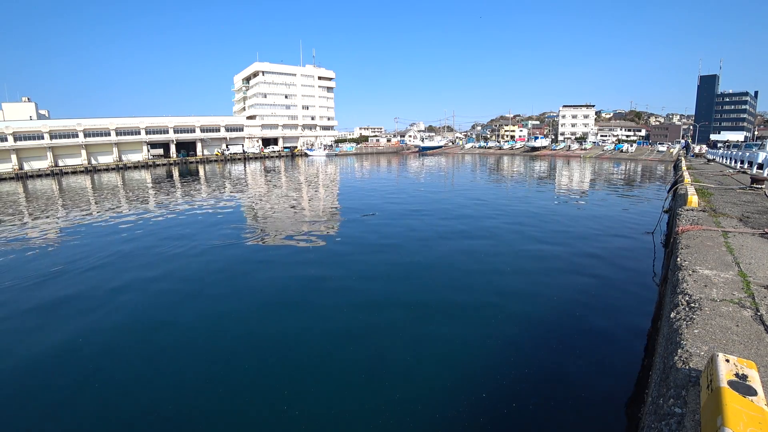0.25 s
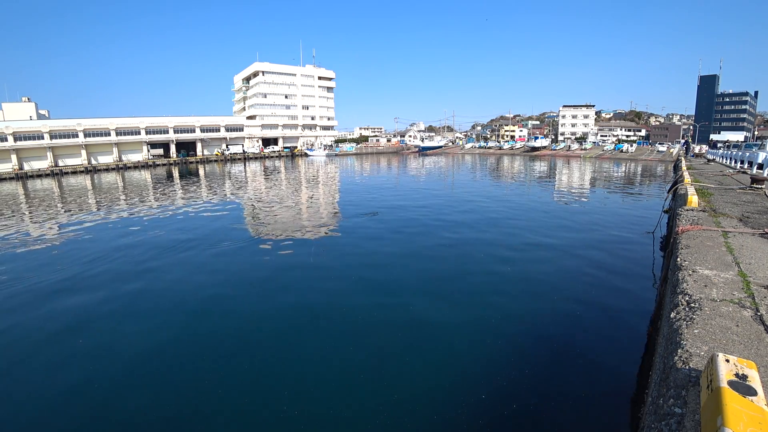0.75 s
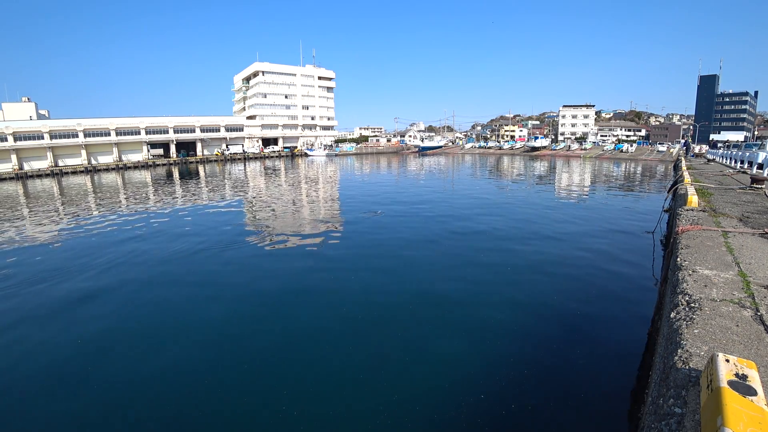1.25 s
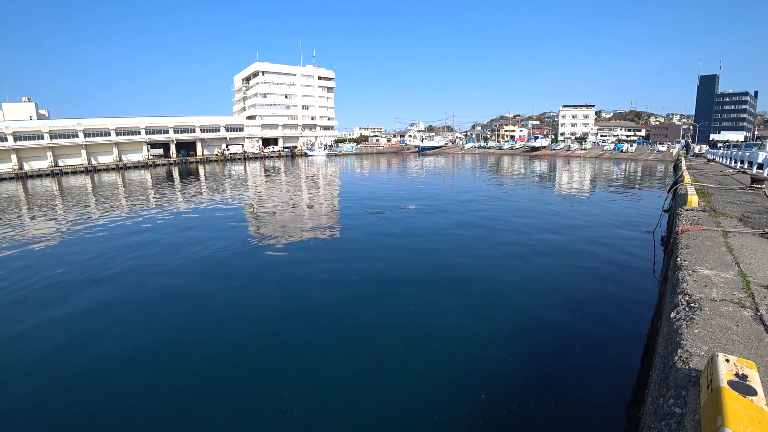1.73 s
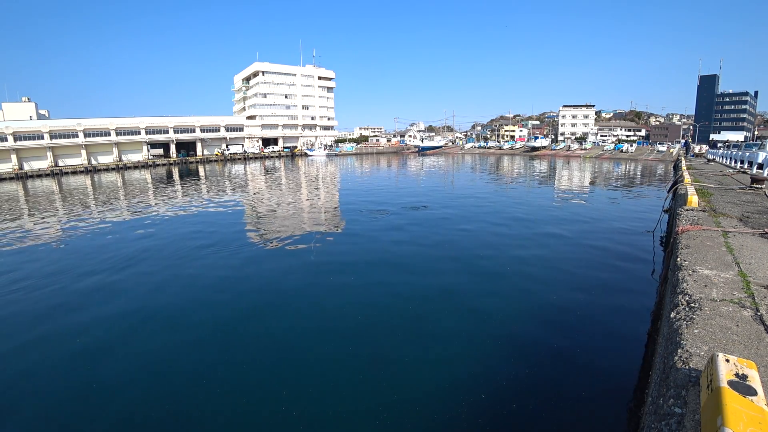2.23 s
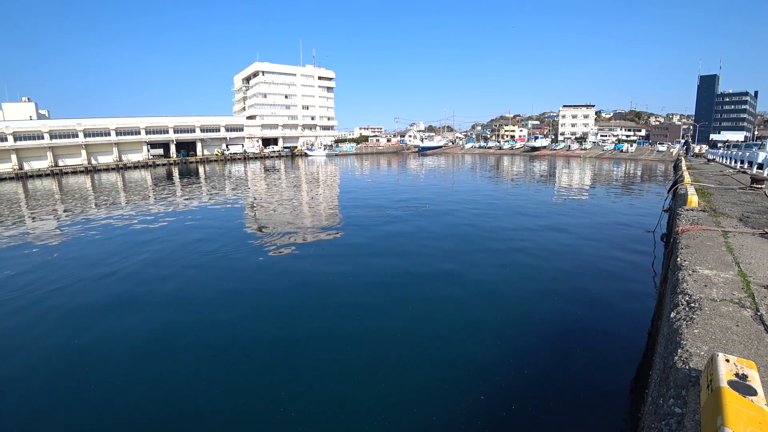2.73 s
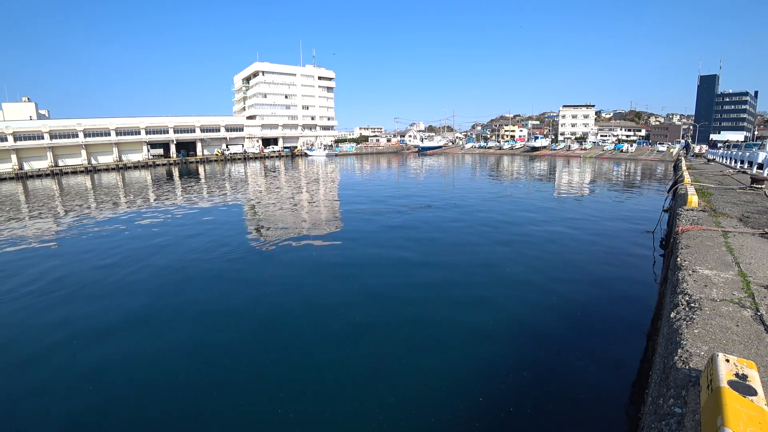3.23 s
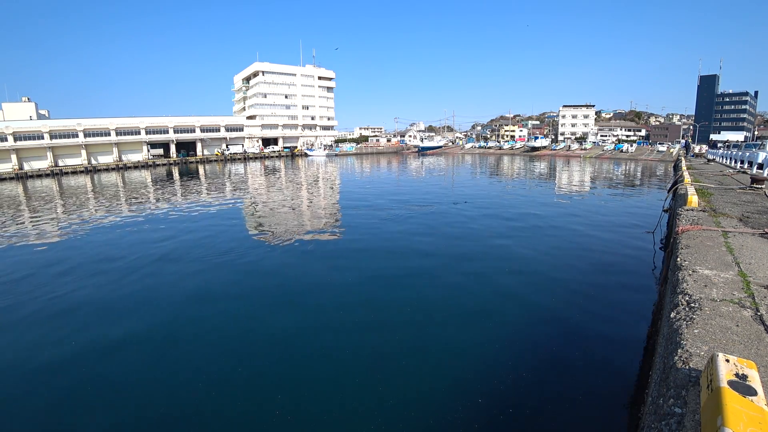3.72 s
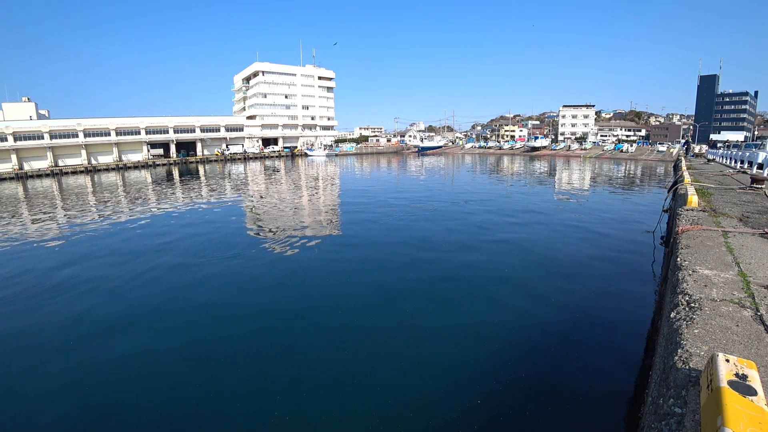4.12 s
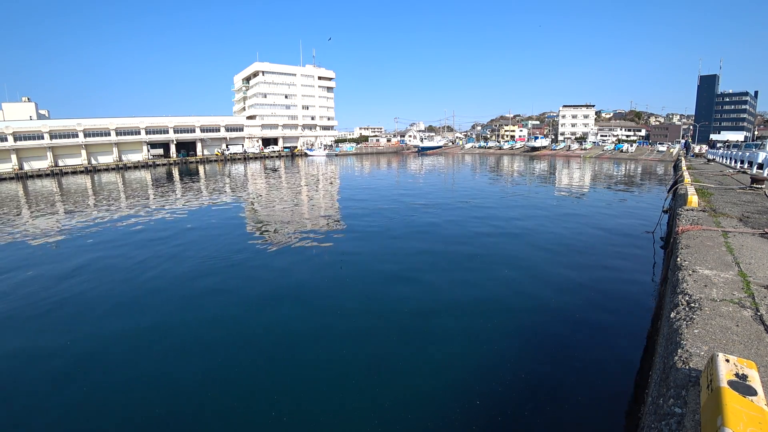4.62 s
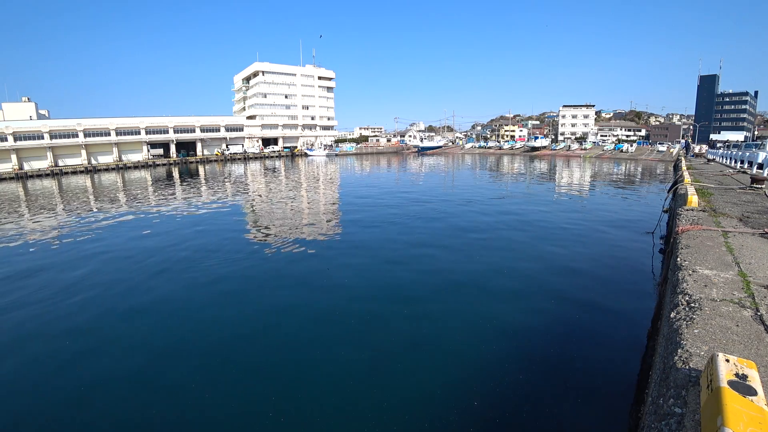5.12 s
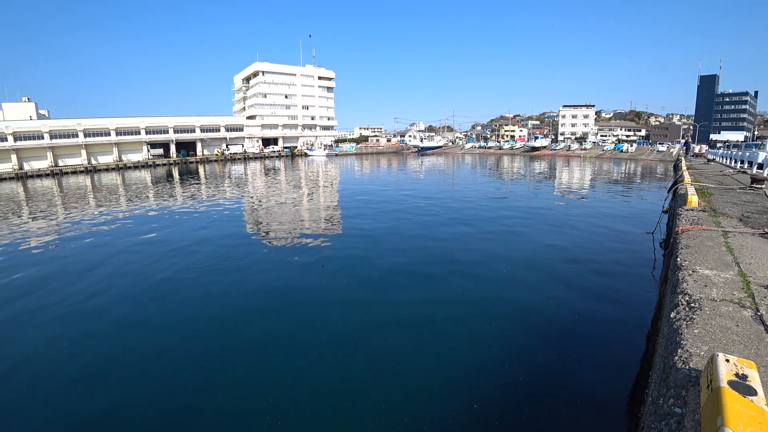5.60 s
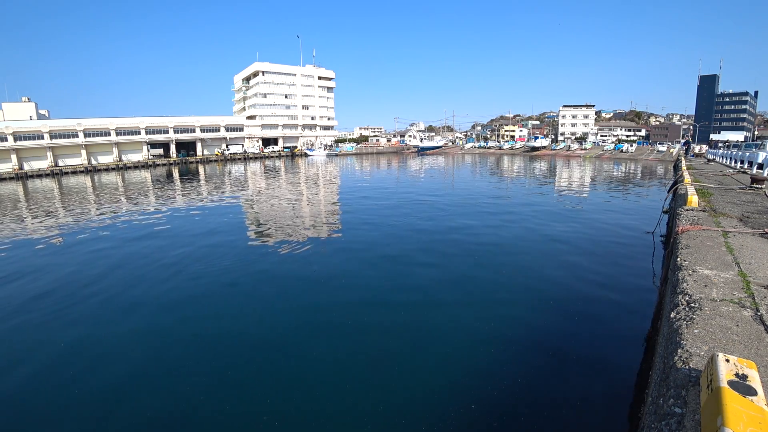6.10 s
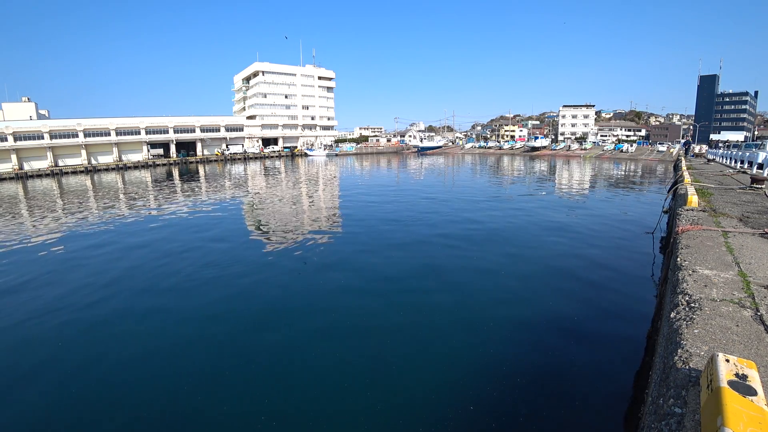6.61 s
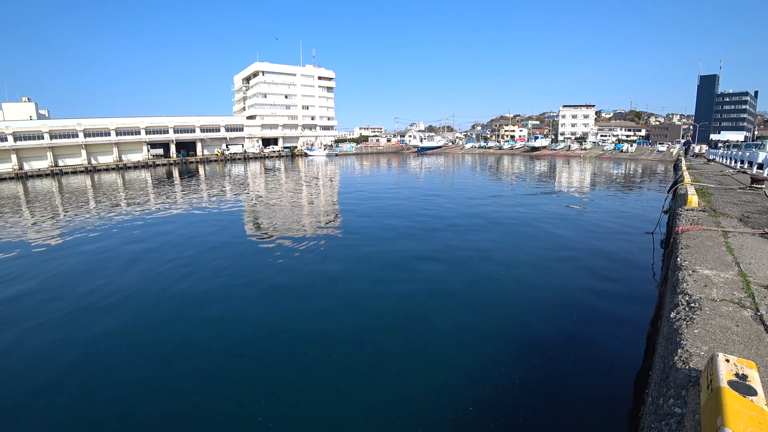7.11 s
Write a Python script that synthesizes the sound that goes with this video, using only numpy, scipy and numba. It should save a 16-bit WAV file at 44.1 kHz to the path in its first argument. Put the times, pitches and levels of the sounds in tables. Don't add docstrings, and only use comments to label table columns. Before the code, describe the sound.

Steady low machinery hum and town rumble over a calm harbour, small waves lapping and bubbling at a quay wall, with soft low wind thumps.

```python
import sys
import numpy as np
from scipy import signal
from scipy.fft import rfft, irfft
from scipy.io import wavfile
from scipy.ndimage import uniform_filter1d
from numba import njit

SR = 44100
rng = np.random.default_rng(int(sys.argv[2]) if len(sys.argv) > 2 else 0)


def file_out(sig):
    cols = np.atleast_2d(sig).T
    lim = np.clip(cols, -1, 1)
    pcm = np.round(lim * 32767).astype(np.int16)
    wavfile.write(sys.argv[1], SR, pcm)


def elevation(decibels):
    levels = np.asarray(decibels, float)
    return 10 ** (levels / 20)


N = 324135


def unit(x):
    return x / np.sqrt(np.mean(x ** 2))


def walk(rate_hz):
    hold = int(SR / rate_hz)
    steps = np.repeat(rng.standard_normal(N // hold + 1), hold)
    return 1.28 * uniform_filter1d(uniform_filter1d(steps, hold), hold)[:N]


def colour(x, hz, db):
    bins_hz = np.arange(N // 2 + 1) * SR / N + 1
    return irfft(rfft(x) * elevation(np.interp(np.log(bins_hz), np.log(hz), db)), N)


def band(x, lo_hz, hi_hz):
    return signal.sosfilt(signal.butter(2, [lo_hz, hi_hz], "bandpass", fs=SR, output="sos"), x)


def sides(x, pan_db):
    return np.array([x * elevation(pan_db / 2), x * elevation(-pan_db / 2)])


def swells(s, db, rise_s, fall_s, floor_db=-120):
    t = np.arange(0, N, 32)[:, None] / SR
    rising = (s - t) / np.maximum(rise_s, .002)
    falling = (t - s) / np.maximum(fall_s, .002)
    slope = np.where(t < s, rising, falling)
    power = np.sum(elevation(db - 20 * slope) ** 2, axis=1) + elevation(floor_db) ** 2
    return np.interp(np.arange(N) / SR, t[:, 0], 10 * np.log10(power))


@njit
def grains(start, hz, ring, size, glide):
    out = np.zeros(N)
    for k in range(len(start)):
        phase = 0.
        for i in range(min(int(6 * ring[k]), N - start[k])):
            age = i / ring[k]
            phase += 2 * np.pi * hz[k] * (1 + glide * age) / SR
            out[start[k] + i] += size[k] * (1 - np.exp(-4 * age)) * np.exp(-age) * np.sin(phase)
    return out


def machine(rate_hz, orders, wander, flutter_db):
    turns = np.cumsum(rate_hz * (1 + wander * walk(1.537))) / SR
    out = np.zeros(N)
    for order, db in orders:
        level = np.sqrt(2) * elevation(db + flutter_db * walk(2.94))
        out += level * np.sin(2 * np.pi * (order * turns + rng.random()))
    return out


# multiple of 59.94 Hz [1], level/dB rms
WHINE_TONES = [(152, -104), (165, -91.5), (166, -90.5), (167, -110), (168, -93), (203, -115), (206, -96),
               (207, -95)]


def electronics():
    whine = machine(59.94, WHINE_TONES, 0, .6)
    return np.array([1.6 * whine, 1.1 * np.roll(whine, shift=1)])


# f/Hz, width/Hz, level/dB rms
TOWN_HUMS = [(375.4, 45, -65.5), (549.7, 42, -61), (747, 48, -64.5), (929, 75, -69)]


def town_hums():
    noise = rng.standard_normal(N)
    out = np.zeros(N)
    for hz, width_hz, db in TOWN_HUMS:
        out += elevation(db + 2.55 * walk(4.745)) * unit(band(noise, hz - width_hz / 2, hz + width_hz / 2))
    return out


# f/Hz, mid level/dB per Hz, side level/dB per Hz
TOWN_SPECTRUM = [(28, -61.5, -112), (99, -65, -104), (193, -69.5, -100), (334, -73, -91.5), (620, -81, -89),
                 (1103, -83.5, -89), (1795, -92.5, -94.5), (3230, -100, -100), (5960, -106, -109),
                 (9700, -111, -116), (11200, -108, -108), (12300, -102, -118), (12700, -110, -118),
                 (15500, -114, -119)]


def town():
    hz, mid_db, side_db = np.transpose(TOWN_SPECTRUM)
    mid = colour(rng.standard_normal(N) * np.sqrt(SR / 2), hz, mid_db)
    side = colour(rng.standard_normal(N) * np.sqrt(SR / 2), hz, side_db)
    swell = 0.1 * walk(8) * band(mid, 30, 450) + 0.044 * walk(2.9) * band(mid, 310, 2600)
    side = side + 0.17 * band(mid, 300, 14000)
    return mid + swell + town_hums() + np.array([side, -side])


# multiple of cycle rate [1], level/dB rms
GENERATOR_ORDERS = [(3, -38.5), (4, -61), (5, -60), (6, -36.5), (7, -61), (14, -63.5), (15, -66.5),
                    (16, -64), (17, -68), (19, -65), (23.5, -65.5), (24, -76)]
# multiple of shaft rate [1], level/dB rms
PUMP_ORDERS = [(1, -60), (2, -45.5), (3, -54), (16, -78)]
# multiple of shaft rate [1], level/dB rms
FAN_ORDERS = [(28, -89.5), (29, -69), (30, -63.5), (31, -73), (33, -67), (57, -76), (63, -74)]


def boats():
    generator = machine(19.94, GENERATOR_ORDERS, 0.00051, 0.25)
    pump = machine(24.32, PUMP_ORDERS, 0.00188, 0.99)
    fan = machine(25.02, FAN_ORDERS, 0.0006, 0.88)
    return generator + pump + sides(fan, 1.2)


# t/s, f/Hz, left pressure [1], right pressure [1]; push +, pull -
EDDY_SLAPS = [(0.4872, 290, -0.33, 0.18), (0.4942, 159, 0.14, 0.13), (.56, 45, 0.062, .05),
              (.576, 60, -0.012, -.13), (0.599, 257, -0.1, -0.042), (0.606, 185, 0.042, 0.13),
              (0.614, 340, 0.11, -0.17), (0.6173, 380, 0.13, 0.094), (0.623, 400, -0.42, 0.51),
              (0.63, 65, -.1, -.13), (1.2916, 243, -0.016, 0.17), (1.298, 216, -0.14, 0.061),
              (2.3534, 282, .01, 0.075)]


def eddies():
    before, after = 900, 1300
    t = np.arange(-before, after) / SR
    out = np.zeros((2, N))
    for s, hz, left, right in EDDY_SLAPS:
        at = int(s * SR) - before
        width_s = np.where(t < 0, [[.28], [.48]], [[.62], [.36]]) / hz
        slap = np.exp(-(t / width_s) ** 2) * np.cos(2 * np.pi * hz * t)
        out[:, at:at + len(t)] += np.array([[left], [right]]) * slap
    return out


# peak t/s, rumble level/dB, 20 dB rise/s, 20 dB fall/s
WIND_GUSTS = [(0, -58, .1, .16), (.49, -37, .03, .2), (.61, -30, .2, .08), (.72, -42, .1, .3),
              (1.02, -48, .25, .2), (1.1, -40, .1, .08), (1.3, -35.5, .12, .12), (2.2, -46, .09, .6),
              (2.38, -40, .15, .22), (3.12, -54, .15, .3), (4.2, -55, .25, .1), (6.41, -43, .2, .2),
              (6.7, -56, .3, .3)]


def wind():
    db = swells(*np.transpose(WIND_GUSTS), floor_db=-79)
    shared = unit(band(rng.standard_normal(N), 22, 85))
    reach = elevation(.4 * (db + 26) - 10)
    out = eddies()
    for port in range(2):
        noise = rng.standard_normal(N)
        deep = unit(band(noise, 53, 54))
        body = unit(band(noise, 117, 175))
        upper = unit(band(band(noise, 240, 350), 133, 690))
        out[port] += elevation(db + 3 * walk(40)) * (.95 * shared + .35 * deep + .4 * body + upper * reach)
    return out


# t/s, f/Hz, peak level/dB, ring/ms
WALL_BUBBLES = [(.2612, 1500, -43, 1.7), (.2625, 2870, -43, 2.9), (1.4249, 3110, -42, 6.1),
                (1.4329, 2180, -33, 1.4), (1.434, 680, -31, 4.7), (1.4453, 1710, -43, 6.2),
                (1.663, 2400, -33.5, 1.8), (1.7058, 1300, -33, 2.5), (1.737, 1006, -38, 6.7),
                (1.7761, 1820, -37.5, 4.7), (1.803, 848, -36.5, 11.4), (1.815, 890, -29, 4.7),
                (1.873, 1290, -32, 2.5), (2.9662, 3040, -39.5, 1.6), (2.8935, 1260, -42.5, 3.2),
                (2.993, 430, -35, 6), (3.0054, 1250, -44, 2.5), (3.385, 1480, -40, 1.3),
                (4.609, 620, -35, 2), (4.6249, 865, -32.5, 3.8), (4.6511, 1810, -39, 1.8),
                (6.09, 2060, -37, 2.9), (6.465, 750, -36, 4.5), (6.579, 2310, -37, 1.9),
                (6.5957, 2340, -33.5, 2), (6.891, 1560, -38, 1.5), (6.961, 630, -33, 4.4),
                (7.0594, 860, -33.5, 2), (7.0646, 1100, -34, 1.9), (7.245, 1320, -40.5, 6.1)]


def bubbles():
    s, hz, db, ms = np.transpose(WALL_BUBBLES)
    ring_s = (ms + 1.14) * 0.00069
    start = ((s - 0.302 * ring_s) * SR).astype(np.int64)
    return grains(start, .95 * hz, ring_s * SR, elevation(db + 3.0), 0.069)


# t/s, peak level/dB, f/Hz
DROPLETS = [(.155, -43, 4750), (.2305, -44, 7000), (.2612, -38.5, 4570), (.9172, -46, 7000),
            (1.303, -47, 6860), (1.3132, -42, 6860), (1.4235, -39, 4200), (1.6565, -45, 4070),
            (1.7735, -44.5, 6320), (1.8915, -43, 4000), (1.9872, -45.5, 4890), (2.8912, -46, 3500),
            (2.9395, -41, 8000), (2.9657, -39.5, 3600), (3.0003, -31, 3270), (3.2982, -46.5, 4000),
            (3.3848, -40, 6450), (3.3968, -38.5, 6000), (4.534, -47, 7500), (4.5456, -43, 8000),
            (4.554, -41, 8500), (4.5615, -38, 10500), (4.6256, -40.5, 3740), (6.0865, -40, 6290),
            (6.1033, -40.5, 6890), (6.544, -37.5, 4220), (6.5888, -33, 5750), (6.6805, -43, 6770),
            (6.9325, -39, 4320), (7.0500, -38, 3800)]
# t/s, peak level/dB, f/Hz
MORE_DROPLETS = [(1.3364, -43, 6700), (1.7068, -36, 4200), (1.7464, -47, 6740), (1.8118, -44, 3300),
                 (1.9215, -44.5, 3400), (2.8814, -48, 4500), (2.9183, -46, 6000), (2.9860, -42, 3400),
                 (2.9951, -41, 5500), (3.4024, -46, 9000), (4.586, -48, 7220), (4.609, -48, 7000),
                 (6.0631, -49, 7240), (6.6478, -45, 4500), (6.7336, -39.5, 4000), (6.8231, -45, 3800),
                 (6.859, -44, 6110), (6.8684, -41, 7000), (7.0135, -43, 6720), (7.0693, -39, 4690),
                 (7.1412, -46, 4100), (7.2, -48, 4200), (7.2519, -45, 4380), (7.3148, -43, 4560)]


def droplets():
    drops = list(DROPLETS) + list(MORE_DROPLETS)
    s, db, hz = np.transpose(drops)
    pop_lag_s, pop_pitch, pop_db = .002, .65, -5
    out = grains((s * SR).astype(np.int64), hz, 1.3 * SR / hz, elevation(db + 10.5), 0.012)
    pop_start = ((s + pop_lag_s) * SR).astype(np.int64)
    out += grains(pop_start, pop_pitch * hz, 5 * SR / hz, elevation(db + pop_db), 0.031)
    age_s = np.arange(400) / SR
    fade = np.exp(-age_s / 0.0021)
    for s, db, hz in drops:
        spit = band(rng.standard_normal(len(age_s)), hz / 2, 11400) * fade
        out[int(s * SR):][:len(age_s)] += elevation(db - 8) * spit
    return out


def swarm(fizz_db, count=400):
    lo_hz, hi_hz, ring_s, over_fizz_db = 695, 4200, .002, 1.5
    when, pitch, luck = rng.random((count, 3)).T
    at = (when * N).astype(np.int64)
    hz = lo_hz * (hi_hz / lo_hz) ** pitch
    return grains(at, hz, ring_s * SR * (0.64 + luck), elevation(fizz_db[at] + over_fizz_db), 0.077)


def bursts():
    per_s, fade_s, size_db = 90, .007, 2.5
    kicks = np.zeros(N)
    when, luck = rng.random((int(per_s * N / SR), 2)).T
    kicks[(when * N).astype(int)] = -np.log(1 - .9 * luck)
    jump = signal.lfilter([1], [1, -np.exp(-1 / (fade_s * SR))], kicks)
    return size_db * (jump - jump.mean())


# f/Hz, level/dB per Hz
FOAM_SPECTRUM = [(600, -22), (1000, 2), (1450, 2.5), (2300, -2.5), (2800, -3.5), (4100, 0), (5500, -6.5),
                 (6800, -2.5), (9000, -14.5), (10800, -9.5), (15600, -30)]


def foam(count=22000):
    when, pitch, luck, cycles = rng.random((count, 4)).T
    hz = 700 + 14500 * pitch ** 1.6
    size = elevation(-3.2 * np.log(1 - .985 * luck)) * np.sqrt(hz) * pitch ** .3
    ring = (0.86 + 2.8 * cycles) * SR / hz
    tiny = unit(grains((when * N).astype(np.int64), hz, ring, size, 0.042))
    hiss = unit(elevation(5 * walk(500)) * rng.standard_normal(N))
    return unit(colour(tiny + .8 * hiss, *np.transpose(FOAM_SPECTRUM)))


# peak t/s, fizz level/dB, 20 dB rise/s, 20 dB fall/s, fine spray share/dB
WAVELETS = [(.156, -61, 0.3, -0.04, -9), (.21, -61, 0.16, 0.23, 0), (.268, -51, .1, .1, -8),
            (.332, -52, .03, 0, -11), (1.303, -48.5, .003, 0.18, -2.5), (1.428, -43.5, 0.1, 0.13, -5.5),
            (1.659, -42.5, -0.01, 0.32, -5), (1.808, -49, 0.1, 0.24, -13), (1.98, -55, 0.3, 0.02, -10),
            (2.88, -61, 0.1, 1, -13), (2.935, -57.5, 0.06, 0.07, 2), (2.998, -42.5, .05, 0.01, -5.5),
            (3.294, -56, .035, 0.5, -13), (3.386, -53, .006, 0.1, -8), (4.504, -56, 0.1, 0.6, -8),
            (4.56, -57, -0.34, .15, -3), (4.626, -45.5, 0.05, .06, -10), (6.088, -55, 0.23, 0.17, -7),
            (6.596, -45, 0.2, 0.14, -6.5), (6.677, -44.5, 0.01, .5, -6.5), (6.93, -45.5, 0.33, 0.23, -8),
            (7.054, -43, 0.1, .11, -5.5), (7.206, -45.5, 0.47, 0.2, -11), (7.248, -48.5, -0.02, .6, -11)]


def fizz():
    spray_hz = 5260
    whole = foam()
    coarse = colour(whole, [spray_hz / 1.3, spray_hz * 1.3], [0, -30])
    fine = whole - coarse
    s, db, rise_s, fall_s, spray_db = np.transpose(WAVELETS)
    body_db = swells(s, db, rise_s, fall_s)
    fine_db = swells(s, db + spray_db + 5, rise_s, fall_s)
    patchy = elevation(-3.0 + 0.87 * walk(90) + bursts())
    return patchy * (elevation(body_db) * coarse + elevation(fine_db) * fine) + swarm(body_db)


# t/s, left minus right level/dB
WALL_PAN = [(0, -1), (4.5, -0.5), (7.35, -2)]


def water_pan():
    return np.interp(np.arange(N) / SR, *np.transpose(WALL_PAN)) + 0.65 * walk(15)


def quay(water, lag_s=.0035, echo_db=-11):
    late = int(lag_s * SR)
    return water + elevation(echo_db) * np.array([np.roll(water[0], late), np.roll(water[1], late + 9)])


def scene():
    water = fizz() + bubbles() + droplets()
    return electronics() + town() + boats() + wind() + quay(sides(water, water_pan()))


def top_cut(x):
    return signal.sosfilt(signal.butter(12, 15790, fs=SR, output="sos"), x)


def record(dry):
    mix = signal.sosfilt(signal.ellip(8, .2, 60, 15750, fs=SR, output="sos"), dry)
    return top_cut(mix)


dry = scene()
out = record(dry)
file_out(out)
```